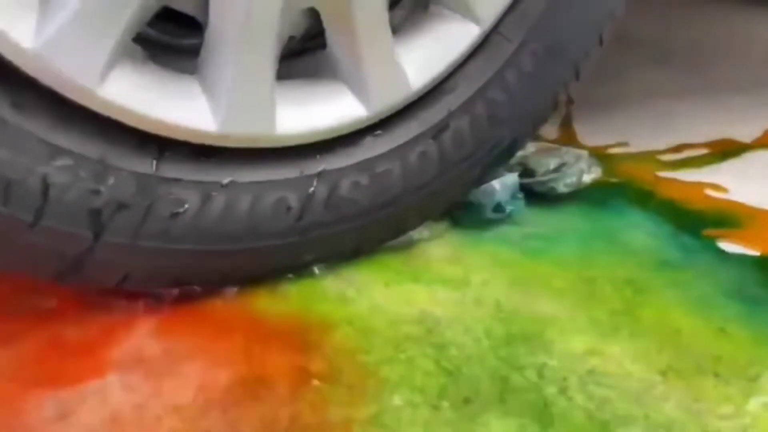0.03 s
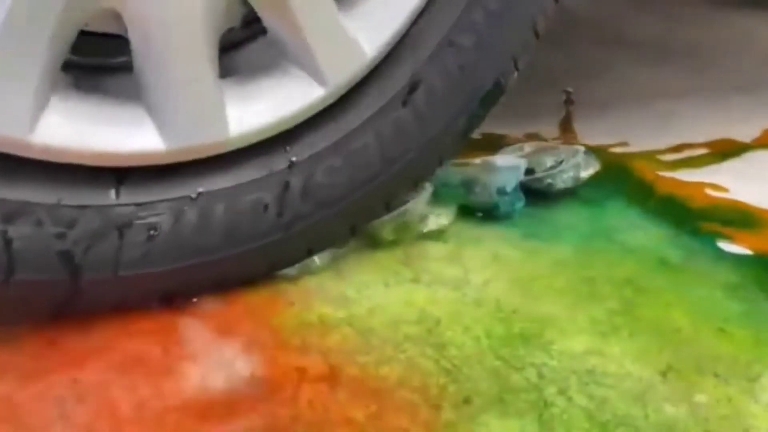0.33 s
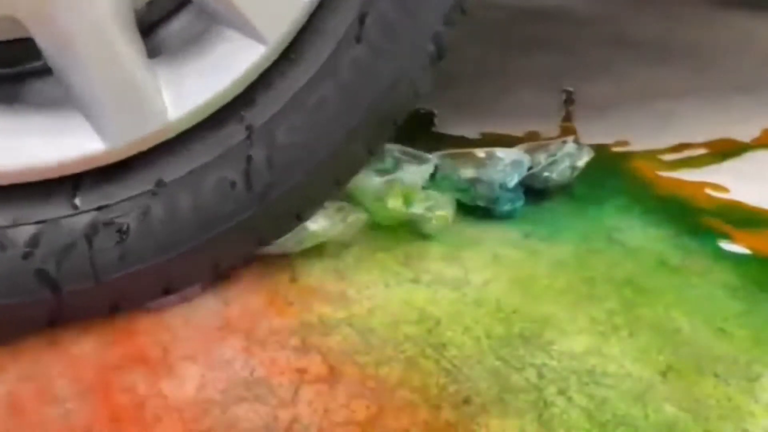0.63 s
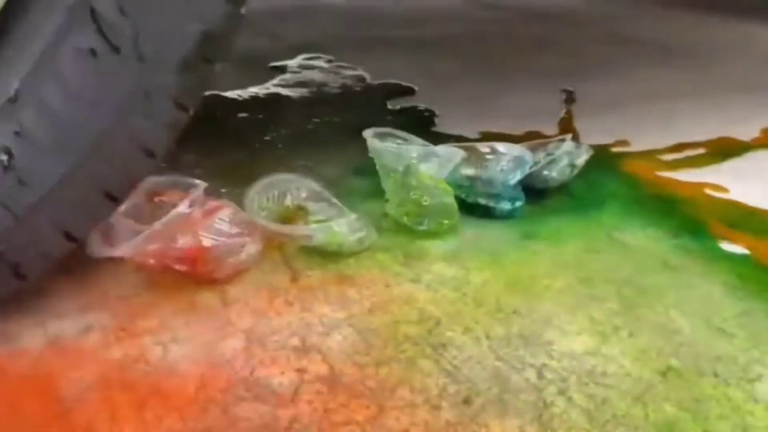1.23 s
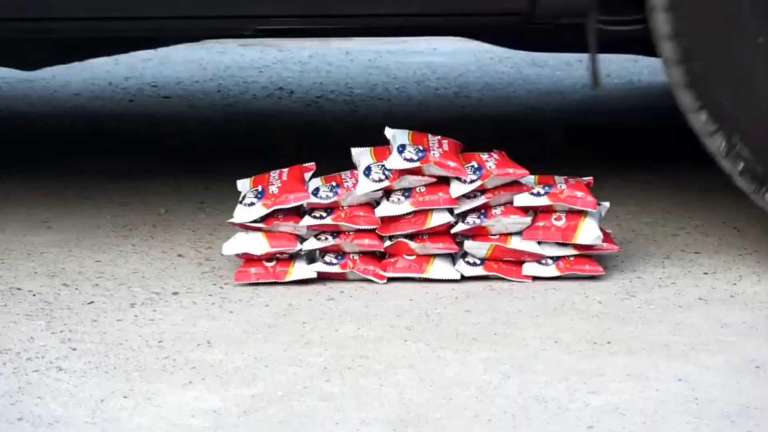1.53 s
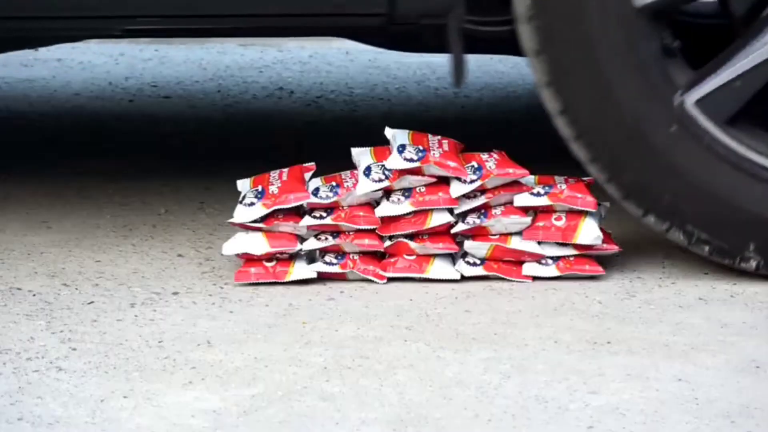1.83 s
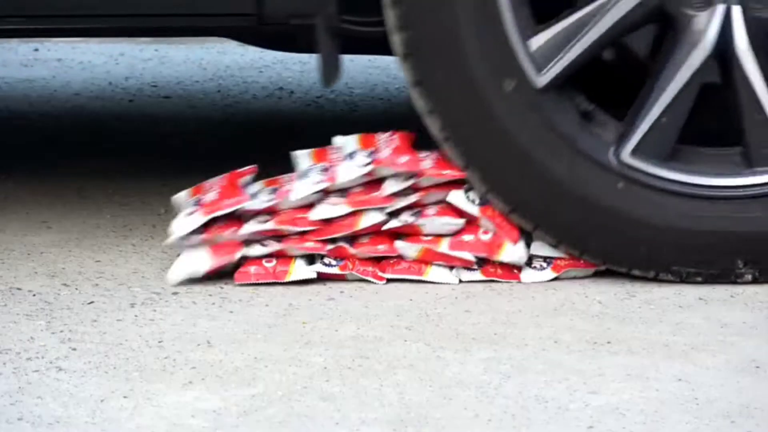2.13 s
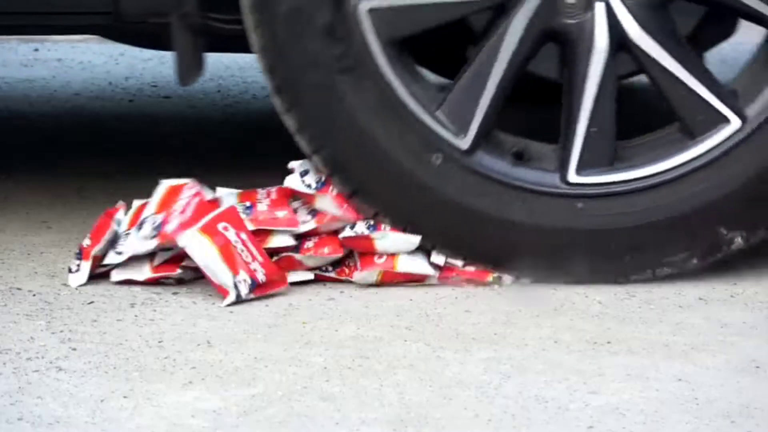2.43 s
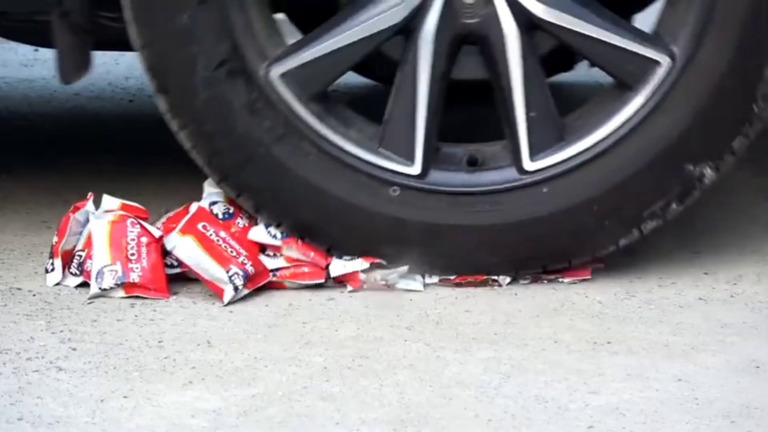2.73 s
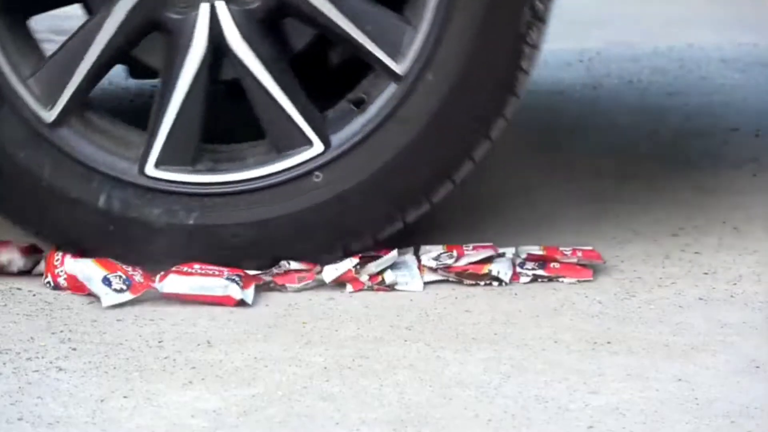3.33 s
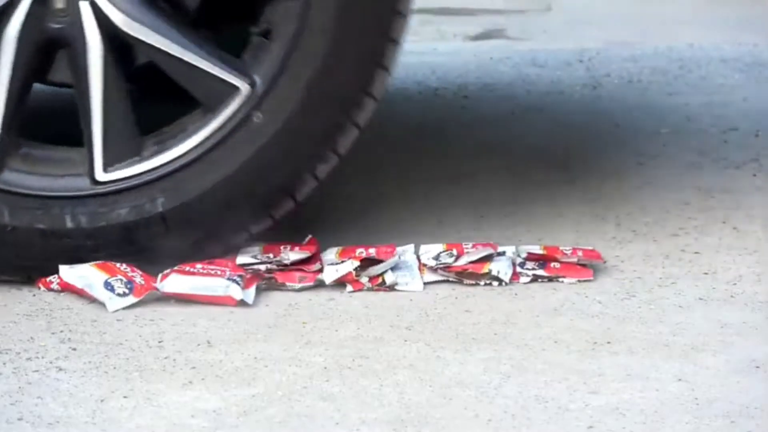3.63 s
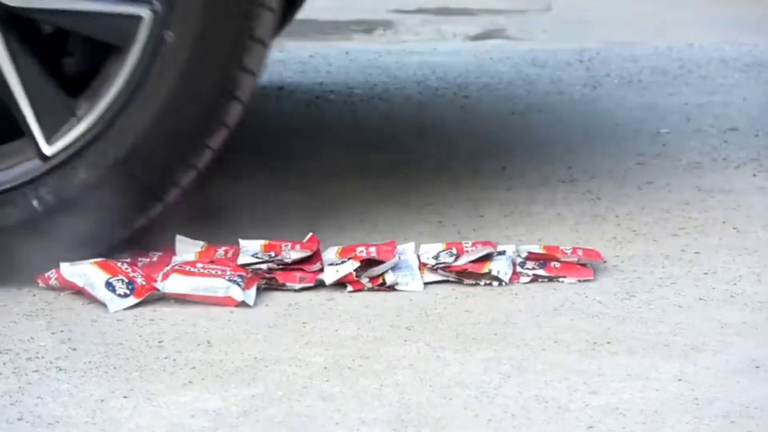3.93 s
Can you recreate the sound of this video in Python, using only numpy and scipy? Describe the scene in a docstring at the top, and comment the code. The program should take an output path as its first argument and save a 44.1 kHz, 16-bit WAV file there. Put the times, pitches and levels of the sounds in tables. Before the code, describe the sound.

A car tyre crushes wet plastic bags, then crunches over a pile of popping snack packets.

```python
"""A car tyre crushes small wet plastic bags, then climbs a pile of wrapped snacks on concrete.
The bags snap one after another, and the liquid squeezed out of them squelches and sprays.
From about 2 s the foil rustles, packets burst with pulses of pressure, and escaping air and breaking
crumbs excite the resonances of the wrappers in waves of crunching, with a short outdoor echo.
Beneath lie a low car rumble, one gust of wind and, by the pile, an engine hum."""
import sys
import numpy as np
from scipy import signal
from scipy.fft import rfft, irfft
from scipy.io import wavfile
from scipy.ndimage import uniform_filter1d, map_coordinates

SR = 44100
rng = np.random.default_rng(int(sys.argv[2]) if len(sys.argv) > 2 else 0)


def store_wav(level_fs):
    """Save 16-bit WAV to argv[1]."""
    pcm = np.round(np.clip(np.atleast_2d(level_fs), -1, 1) * 32767)
    wavfile.write(sys.argv[1], SR, pcm.T.astype(np.int16))


N = 176400
T = np.arange(N) / SR
PILE_STARTS_S = 1.5

# spectrum of snapping film and of spray: (frequency [Hz], level [dB])
FILM_SPECTRUM = [(700, -8), (2000, -8), (4000, -2.5), (6500, 1), (10000, 1), (13000, -5.5), (16000, -31)]
# stereo width around the wet bags: (frequency [Hz], side level [dB])
WET_WIDTH = [(100, -20.5), (400, -12), (1300, -24.5), (2400, -20), (4400, -12), (9000, -11.5)]


def packet_bursts():
    """Sudden pressure release: a sealed packet gives way with a heavily damped pop and a seam crack."""
    # (time [s], pop level [dB], pop pitch [Hz], crack level [dB])
    bursts = [(2.326, 7, 720, -5), (2.49, 2, 1180, -14), (2.5988, -3, 870, -17), (2.7516, -2.5, 780, -30),
              (2.8212, 0.5, 2310, -10), (2.8408, 5, 930, -5), (2.9290, 7, 690, 2), (2.9546, -1, 900, -4),
              (2.9585, 1, 674, -13), (3.1348, -2, 960, -7), (3.1585, 1, 750, -18), (3.2777, 2.5, 750, -23),
              (3.5211, 2, 624, -7), (3.5982, -23, 1510, 3), (3.866, -24.5, 3200, -26),
              (3.885, 0.5, 2930, -4)]
    pop_decay_s, crack_decay_s = 0.00043, 0.0002
    out, t = np.zeros(N), T[:1024]
    for s, pop_db, hz, crack_db in bursts:
        pop = np.cos(2 * np.pi * hz * t) * np.exp(-t / pop_decay_s)
        crack = noise(len(t), [(800, 7.5), (3000, 4.5), (7000, 14.5), (15000, -23.5)])
        add(out, s, undb(pop_db) * pop + undb(crack_db) * crack * np.exp(-t / crack_decay_s))
    return out


def packet_crunches():
    """Impulse-excited resonance: sputtering air, breaking crumbs and crinkling foil ring each packet."""
    # (time [s], hold [s], air level [dB], air resonance [Hz], crumb level [dB], crumb resonance [Hz],
    #  hollowness [Q], foil level [dB])
    crunches = [(2.328,0.039,-15,852,-16.5,2860,1.5,-27), (2.397,0.036,-12.5,877,-22,2310,2.9,-25.5),
                (2.502,0.025,-11.5,934,-16.5,2240,1,-29.5), (2.566,0.026,-23,850,-44,2500,0.64,-36),
                (2.613,0.038,-15.5,707,-21,4540,2.1,-39), (2.849,0.017,-12,1253,-19.5,3840,1.1,-29),
                (2.882,0.017,-11,686,-23,3200,4.4,-42), (2.943,0.017,-20,900,-18,3080,0.7,-29.5),
                (2.977,0.014,-21,780,-19,3270,0.91,-36), (3.024,0.017,-13,772,-18,2880,2,-24),
                (3.08,0.018,-16.5,847,-24.5,4200,2.2,-37), (3.157,0.0064,-16.5,740,-26,3100,1.7,-32),
                (3.281,0.032,-15,914,-31,2540,5,-31), (3.308,0.032,-12,1166,-22.5,2100,0.62,-30),
                (3.384,0.035,-17.5,794,-28,2270,1.3,-32.5), (3.527,0.016,-11,870,-27.5,2100,3.2,-30),
                (3.57,0.0082,-19.5,912,-24,1970,0.65,-28), (3.611,0.011,-17.5,802,-25,2490,0.92,-24),
                (3.884,0.047,-15.5,950,-19,3050,2.8,-30.5), (3.941,0.086,-17,984,-22,3050,4.2,-28.5)]
    # spectra of the three layers: (frequency [Hz], level [dB])
    air_spectrum = [(40, -35), (110, 1.5), (220, 3.5), (450, 1), (900, -1.5), (1400, -3.5), (2000, -8),
                    (3500, -17), (8000, -37)]
    crumb_spectrum = [(600, -44), (1400, 9), (2000, 3.5), (3200, 2.5), (4600, -1.5), (6000, -3),
                      (10000, -14)]
    foil_spectrum = [(2000, -63), (4000, 2.5), (5500, 3.5), (8000, 2), (10000, -5), (13000, -5),
                     (16000, -18)]
    attack_s, air_release_s, crumb_release_s, foil_release_s = 0.0015, 0.065, 0.06, 0.051
    out, t = np.zeros(N), T[:14000]
    attack = np.minimum(t / attack_s, 1)
    for s, hold, air_db, air_hz, crumb_db, crumb_hz, hollow_q, foil_db in crunches:
        sputter = flicker(len(t), db=2.2, size=300)
        air = pockets(clicks(len(t), per_s=1300, spread_db=2.6), air_hz)
        air = sag(resonate(air, air_hz, q=0.5 * np.sqrt(hollow_q)))
        crumbs = pockets(clicks(len(t), per_s=1800, spread_db=2.0), crumb_hz)
        crumbs = resonate(crumbs, crumb_hz, hollow_q)
        foil = pockets(clicks(len(t), per_s=1200, spread_db=2.5), hz=7000, q=7)
        for layer, db, release in ((colour(air, air_spectrum), air_db, air_release_s),
                                   (colour(crumbs, crumb_spectrum), crumb_db, crumb_release_s),
                                   (colour(foil, foil_spectrum), foil_db, foil_release_s)):
            envelope = attack * np.exp(-np.maximum(t - hold, 0) / release) / np.sqrt(2)
            envelope_rms = np.sqrt(np.mean(envelope ** 2))
            add(out, s, undb(db) * envelope_rms * unit(layer * sputter * envelope))
    return out


def packet_blowout():
    """Cavity resonance: air rasps through the split seam of the fullest packet and excites its modes."""
    # (frequency [Hz], sharpness [Q], level [dB])
    cavity_modes = [(646, 1.2, 1), (870, 7.3, -9), (2250, 9.5, -5.5), (2610, 5, -4.5), (3420, 12, -12)]
    start_s, hold_s, release_s, level_db = 2.7505, 0.0086, 0.055, -15.5
    out, t = np.zeros(N), T[:14000]
    rasp = clicks(len(t), per_s=1600, spread_db=0.5) * np.exp(-np.maximum(t - hold_s, 0) / release_s)
    envelope_rms = np.sqrt((hold_s + release_s / 2) / t[-1])
    for hz, q, db in cavity_modes:
        mode = unit(resonate(resonate(rasp, hz, q), hz, q))
        add(out, start_s, undb(level_db + db) * envelope_rms * mode)
    return out


def tyre_thumps():
    """Damped impact: the tyre drops onto an emptied packet with a thud of falling pitch."""
    # (time [s], level [dB])
    drops = [(2.3255, -27), (2.8235, -22.5), (2.9275, -29), (2.961, -24), (3.28, -26), (3.5222, -36),
             (3.886, -17)]
    from_hz, to_hz, glide_s, decay_s = 226, 32, 0.0047, 0.002
    out, t = np.zeros(N), T[:4096]
    hz = to_hz + (from_hz - to_hz) * np.exp(-t / glide_s)
    swell = t / decay_s * np.exp(1 - t / decay_s)
    for s, db in drops:
        add(out, s, undb(db) * np.sin(2 * np.pi * np.cumsum(hz) / SR) * swell)
    return out


def wrapper_rustle():
    """Superposition: dense clicks from wrappers under load merge into a rustle."""
    # (time [s], level [dB])
    levels = [(2.05, -70), (2.075, -41), (2.2, -37.5), (2.31, -36), (2.4, -29.5), (3.15, -30), (3.5, -40),
              (3.68, -38.5), (3.85, -58), (3.9, -26), (4, -31.5)]
    # (frequency [Hz], level [dB])
    spectrum = [(150, -17.5), (400, -2.5), (900, -3), (2000, 0), (4500, -6.5), (9000, -10), (15000, -19)]
    return unit(colour(clicks(N, per_s=4000, spread_db=5.0), spectrum)) * curve(levels)


def snack_pile():
    """Direct and reflected sound: the packets echo in the yard while the thumps stay dry."""
    # stereo width: (frequency [Hz], side level [dB])
    width = [(200, -35), (700, -17), (2600, -20), (4400, -17), (7000, -4.5), (15000, -4.5)]
    # (frequency [Hz], left minus right level [dB])
    balance = [(60, 1.5), (200, 3.5), (400, 1.5), (700, -1), (15000, -1)]
    packets = wrapper_rustle() + packet_crunches() + packet_blowout() + packet_bursts()
    packets = echo(packets, t60=1.0, wet_db=-10.5, tone=[(100, 2), (800, -4.5), (3000, -3), (12000, -9.5)])
    stereo = widen(packets, width, size=256) + tyre_thumps()
    pan = np.sqrt(gains(balance, N))
    return irfft(rfft(stereo) * np.array([pan, 1 / pan]), N)


def bag_snaps():
    """Damped transients: each wet bag stretches, then splits with a film snap and a liquid plop."""
    # (time [s], plop level [dB], plop pitch [Hz], film level [dB])
    snaps = [(0.0929,-31,1980,-40.5), (0.099,-32.5,2040,-55), (0.1786,-21.5,1680,-24.5),
             (0.1963,-18,1840,-21), (0.2175,-28,1580,-32), (0.228,-23.5,1700,-32), (0.2388,-26,1760,-26.5),
             (0.253,-37,1000,-52), (0.2828,-28,1820,-42), (0.329,-36,1000,-37.5), (0.373,-35.5,1510,-57),
             (0.4492,-27,1200,-42), (0.4877,-35,1740,-18.5), (0.515,-37,980,-27.5), (.519,-27.5,950,-45),
             (.543,-30.5,1760,-44), (0.5747,-56,1580,-31), (0.647,-31.5,2940,-30), (0.663,-23,1300,-20),
             (0.691,-34,1150,-34), (0.7252,-34,1800,-19), (.8247,-35,1080,-54), (.834,-29,645,-48),
             (0.8456,-30,2650,-23), (0.8975,-33,1220,-30), (0.908,-25,1590,-31), (0.9152,-31,1540,-34.5),
             (0.9552,-30.5,1640,-50), (0.974,-41,1140,-32.5), (1.0431,-25,2270,-40), (1.067,-41,1300,-50),
             (1.079,-34,1100,-53), (1.0934,-25.5,1290,-33), (1.1424,-34.5,1930,-21), (1.215,-64,1890,-34.5),
             (1.261,-37.5,980,-56), (1.2785,-42,1530,-31), (1.3567,-38.5,1960,-50), (1.3744,-49,1290,-33),
             (1.509,-15.5,2060,-41.5)]
    plop_decay_s, film_decay_s = 0.0012, 0.0011
    stretch_s, stretch_db, splash_s, splash_db = 0.0013, -17, 0.0046, -11.5
    out, lead_s = np.zeros(N), T[256]
    t = T[:2048] - lead_s  # zero at the split
    fade = lambda seconds: np.exp(-np.abs(t) / seconds)
    stretch = undb(stretch_db) * fade(stretch_s)
    splash = undb(splash_db) * fade(splash_s)
    plop_envelope = np.where(t < 0, stretch, fade(plop_decay_s) + splash)
    film_envelope = np.where(t < 0, stretch, fade(film_decay_s) + splash)
    for s, plop_db, hz, film_db in snaps:
        slosh = unit(resonate(resonate(rng.standard_normal(len(t)), hz, q=1.9), hz, q=1.0))
        plop = (0.85 * np.sin(2 * np.pi * hz * t) + slosh) * plop_envelope
        film = colour(pockets(rng.standard_normal(len(t)), hz=7220, q=9), FILM_SPECTRUM) * film_envelope
        add(out, s - lead_s, strike(plop, plop_db) + strike(film, film_db))
    return out


def bubbles():
    """Bubble resonance: each bubble rings as a damped sine of rising pitch."""
    out, t = np.zeros(N), T[:2048]
    for when, pitch, strength, life in rng.random((1400, 4)):
        hz = 620 * 4 ** pitch  # spread over two octaves
        chirp = np.sin(2 * np.pi * hz * t * (1 + 25 * t))
        decay = np.exp(-t * hz / (0.88 + 2 * life))
        add(out, when * PILE_STARTS_S, undb(20 * strength ** 2) * chirp * decay)
    return out / np.std(out[T < PILE_STARTS_S])


def squeezed_liquid():
    """Forced flow: liquid under the tread squelches with bubbles and sprays in spurts."""
    # (time [s], squelch level [dB], spray level [dB])
    squeeze = [(0, -48, -53.5), (.06, -51.5, -63), (.12, -49, -62), (.165, -56.5, -74), (.2, -37, -65),
               (.25, -37.5, -67), (.3, -55, -51), (.35, -43.5, -49), (.42, -45.5, -56.5), (.53, -49.5, -69),
               (.61, -55.5, -61), (.68, -42, -49), (.75, -42, -49), (.79, -52.5, -62), (.83, -35.5, -49.5),
               (.88, -46, -69), (.96, -45, -49), (1.02, -51, -56), (1.08, -47.5, -57), (1.18, -57, -77),
               (1.28, -59, -54.5), (1.5, -51.5, -64.5)]
    # (frequency [Hz], level [dB])
    squelch_spectrum = [(150, -20), (350, -2.5), (700, 1.5), (1400, 2), (2400, 1.5), (4000, -5.5),
                        (8000, -35)]
    bubbling = bubbles()
    crackle = unit(colour(clicks(N, per_s=1500, spread_db=5.5), squelch_spectrum))
    squelch = 0.91 * bubbling + 0.51 * crackle
    droplets = colour(clicks(N, per_s=700, spread_db=2.5), FILM_SPECTRUM)
    spray = unit(droplets * flicker(N, db=3, size=500))
    return squelch * curve(squeeze) + spray * curve(squeeze, column=2)


def wet_bags():
    """Direct and reflected sound: snaps and liquid carry a brief, bright echo."""
    bags = bag_snaps() + squeezed_liquid()
    bags = echo(bags, t60=0.28, wet_db=-21.0, tone=[(500, -2.5), (4000, 10.5), (14000, 1.0)])
    return widen(bags, WET_WIDTH, size=128)


def wind_gust():
    """Turbulence: one gust buffets with low-frequency noise."""
    # (time [s], level [dB])
    levels = [(1.475, -37), (1.5, -37), (1.59, -25), (1.695, -26), (1.71, -34), (1.83, -44)]
    # (frequency [Hz], level [dB])
    spectrum = [(20, 4), (50, 0.5), (80, -7.5), (135, 2), (190, -15.5), (450, -19.5), (800, -27.5),
                (1500, -58)]
    return noise(N, spectrum) * curve(levels)


def engine_hum():
    """Periodic vibration: the engine gives one low tone whose pitch wanders slightly."""
    mean_hz, level_db = 104.8, -45
    wander = 0.008 * unit(uniform_filter1d(rng.standard_normal(N), size=2000))
    return undb(level_db) * unit(np.sin(2 * np.pi * np.cumsum(mean_hz * (1 + wander)) / SR))


def background():
    """Broadband noise: the car rumble crossfades from bags to pile, joined by the gust and the hum."""
    # rumble by the bags and in the yard by the pile: (frequency [Hz], level [dB])
    wet_spectrum = [(25, -18), (55, 11.5), (90, 16), (150, 7), (300, -7.5), (900, -17), (2000, -50),
                    (5000, -52), (13000, -24), (15000, -43)]
    yard_spectrum = [(25, -15), (60, -19), (110, -9), (160, -4), (300, -9), (500, -15.5), (900, -22.5),
                     (2000, -27.5), (5000, -36), (15000, -42.5)]
    # stereo width: (frequency [Hz], side level [dB])
    yard_width = [(100, -13), (400, -14), (900, -10), (15000, -4)]
    by_pile = np.clip((T - PILE_STARTS_S) / 0.014 + .5, 0, 1)
    hum = engine_hum()
    wet = undb(-45.5) * noise(N, wet_spectrum) * (1 - by_pile)
    yard = (undb(-43) * noise(N, yard_spectrum) + hum) * by_pile
    return widen(wet + wind_gust(), WET_WIDTH, size=2048) + widen(yard, yard_width, size=2048)


def pockets(x, hz, q=24):
    """Cavity resonance: four small hollows in a crumpled wrapper ring at chance pitches around hz."""
    pitches = hz * 2 ** (1.853 * (rng.random(4) - .5))
    return x + undb(4) * sum(resonate(x, pitch, q) for pitch in pitches)


def sag(x, octaves=0.4, settle_s=0.035):
    """Pitch glide: the air resonance starts sharp and falls as the packet empties."""
    speed = 2 ** (octaves * np.exp(-T[:len(x)] / settle_s))
    return map_coordinates(x, [np.cumsum(speed)], order=3, mode="mirror")


def echo(x, t60, wet_db, tone):
    """Reverberation: diffuse reflections from ground, car body and walls fall 60 dB in t60 seconds."""
    t = T[:SR]
    tail = noise(SR, tone) * undb(-60 * t / t60) * (1 - np.exp(-t / .004))
    tail /= np.sqrt(np.mean(np.abs(rfft(tail)[500:3000]) ** 2))  # unit gain over 500-3000 Hz
    return x + undb(wet_db) * signal.fftconvolve(x, tail)[:N]


def widen(x, width, size):
    """Decorrelation: scattered sound, random in phase in frames of size samples, is the stereo side."""
    frames = signal.stft(x, nperseg=size)[2]
    scattered = signal.istft(frames * np.exp(2j * np.pi * rng.random(frames.shape)), nperseg=size)[1][:N]
    side = irfft(rfft(unit(scattered) * np.std(x)) * gains(width, N), N)
    return np.array([x + side, x - side])


def clicks(size, per_s, spread_db):
    """Shot noise: random impulses of uneven strength."""
    when, strength, sign = rng.random((3, size))
    return (when < per_s / SR) * np.sign(sign - .5) * undb(-spread_db * np.log(.02 + strength))


def noise(size, spectrum):
    """Filtered Gaussian noise of rms 1."""
    return unit(colour(rng.standard_normal(size), spectrum))


def flicker(n, db, size):
    """Amplitude modulation: a gain that wavers by about db over size samples."""
    return undb(db * unit(uniform_filter1d(uniform_filter1d(rng.standard_normal(n), size), size // 2)))


def resonate(x, hz, q):
    """Two-pole resonance."""
    return signal.lfilter(*signal.iirpeak(min(hz, SR / 4), max(q, .5), fs=SR), x)


def colour(x, points):
    """Minimum-phase filter through (frequency [Hz], level [dB]) points."""
    n = len(x)
    cepstrum = irfft(np.log(gains(points, n)), n)
    cepstrum[1:n // 2] *= 2
    cepstrum[n // 2 + 1:] = 0
    return irfft(rfft(x) * np.exp(rfft(cepstrum)), n)


def gains(points, size):
    """Gain at each frequency bin from (frequency [Hz], level [dB]) points."""
    hz, db = np.array(points).T
    bin_hz = np.arange(size // 2 + 1) * SR / size
    return undb(np.interp(np.log(bin_hz + 1), np.log(hz), db))


def curve(rows, column=1):
    """Envelope from (time [s], level [dB], ...) rows; silent outside them."""
    rows = np.array(rows)
    return undb(np.interp(T, rows[:, 0], rows[:, column], left=-150, right=-150))


def strike(x, db):
    """Give a hit the energy of a 4 ms tone that peaks at db."""
    return x * undb(db) / np.sqrt(2 * np.sum(x ** 2) / (.004 * SR))


def add(out, s, x):
    """Mix a sound in at s seconds."""
    i = max(int(s * SR), 0)
    out[i:i + len(x)] += x[:max(N - i, 0)]


def undb(db):
    """Decibels to gain."""
    return 10 ** (np.asarray(db) / 20)


def unit(x):
    """Scale to rms 1."""
    return x / np.sqrt(np.mean(x ** 2) + 1e-18)


def scene():
    """Superposition: wet bags, then the snack pile, over the background."""
    return wet_bags() + snack_pile() + background()


def record(dry):
    """Band limiting and soft saturation: the deepest bass and top are cut, the highest peaks rounded."""
    low_hz, top_hz, ceiling = 18, 15300, .77
    dry = signal.sosfilt(signal.butter(2, low_hz, "high", fs=SR, output="sos"), dry)
    rounded = dry / (1 + (dry / ceiling) ** 4) ** .25
    return signal.sosfilt(signal.ellip(10, .2, 90, top_hz, fs=SR, output="sos"), rounded)


dry = scene()
out = record(dry)
store_wav(out)
```